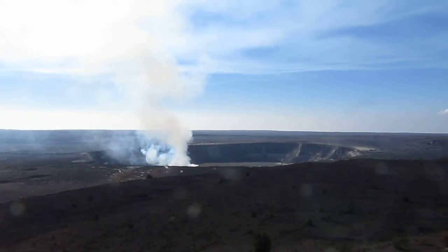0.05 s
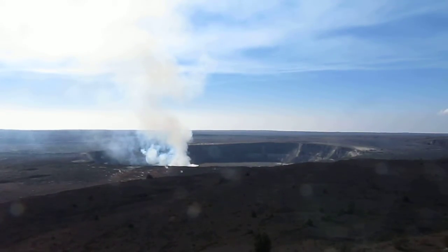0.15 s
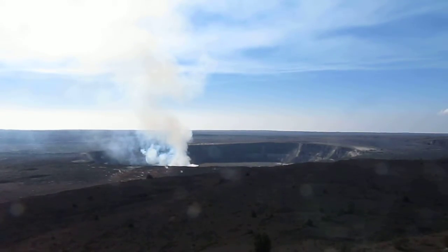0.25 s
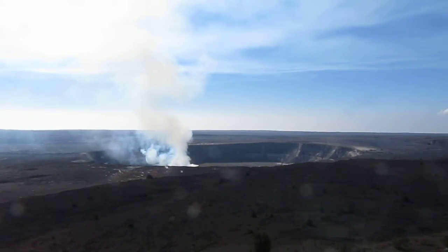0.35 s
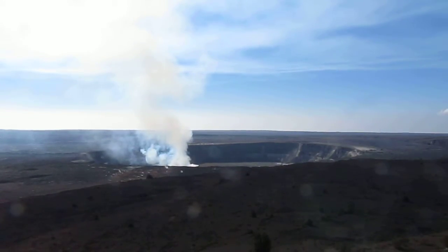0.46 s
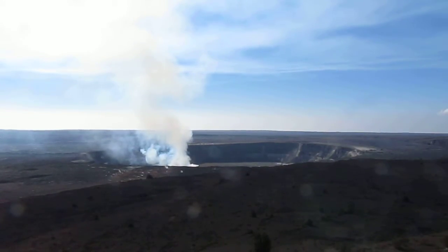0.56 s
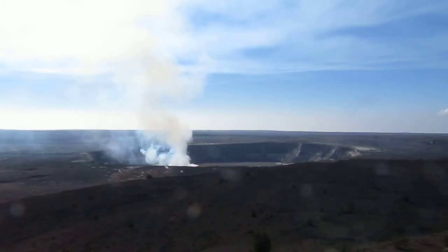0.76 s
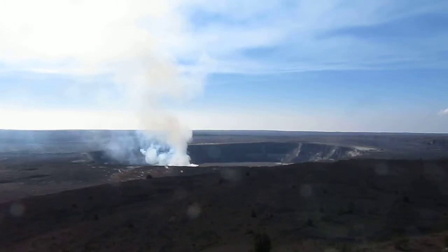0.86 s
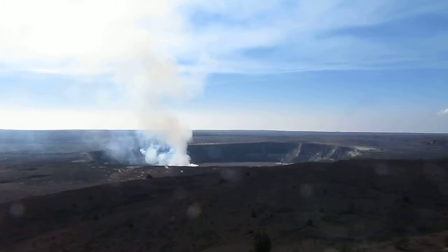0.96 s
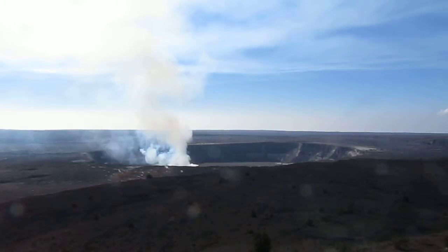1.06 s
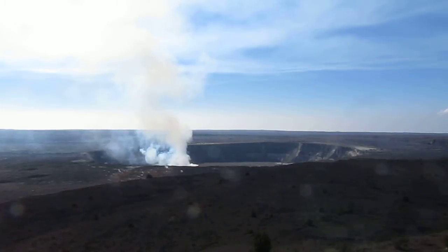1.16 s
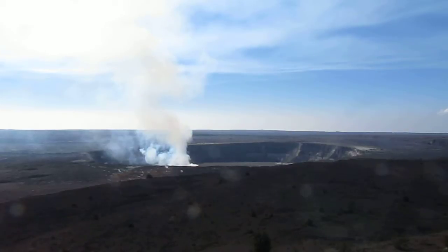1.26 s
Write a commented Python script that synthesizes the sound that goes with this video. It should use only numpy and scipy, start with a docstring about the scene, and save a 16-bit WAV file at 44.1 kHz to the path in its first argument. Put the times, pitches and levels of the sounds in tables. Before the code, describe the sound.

A gust of wind hits the microphone, stronger on the left, with a low flutter and irregular short thumps that swell and die down. Behind it, steam hisses softly and evenly from a far crater across open ground.

```python
"""Steam hisses steadily from a distant vent on open volcanic ground.
A gust rises and fades at the stereo microphone: eddies strike the left port as short, dull thumps
over a fluttering rumble. The recorder's wind filter thins their bass, and its stereo circuit feeds
them inverted to the right. Its gain dips a little after the hardest thumps."""
import sys
import numpy as np
from scipy import signal
from scipy.fft import rfft, irfft
from scipy.io import wavfile
from scipy.ndimage import uniform_filter1d

SR = 44100
rng = np.random.default_rng(int(sys.argv[2]) if len(sys.argv) > 2 else 0)


def generate_wav(sig):
    """Save sig (samples, or channels by samples) to the path in sys.argv[1] as 16-bit PCM at SR."""
    pcm = np.round(np.clip(np.atleast_2d(sig).T, -1, 1) * 32767).astype(np.int16)
    wavfile.write(sys.argv[1], SR, pcm)


N = 57330


def undb(db):
    """Decibels to gain."""
    return 10 ** (np.asarray(db) / 20)


def unit(x):
    """Scale to rms 1."""
    return x / np.sqrt(np.mean(x ** 2))


def over_hz(points):
    """A table over log frequency, read at every bin."""
    hz, value = np.array(points, float).T
    return np.interp(np.log(np.fft.rfftfreq(N, 1 / SR) + 1), np.log(hz), value)


def noise(gain):
    """Noise with the given gain per bin."""
    return irfft(rfft(rng.standard_normal(N)) * gain, N)


def wander(rate_hz):
    """Smooth random wander with rms 1."""
    hold = max(int(SR / rate_hz), 2)
    steps = np.repeat(rng.standard_normal(N // hold + 2), hold)
    return unit(uniform_filter1d(uniform_filter1d(steps, hold), hold)[:N])


# Colour of the steam jet, heard from far across open ground: freq_hz, relative_db
STEAM_SPECTRUM = [(40, -5.5), (150, -17), (400, -5.5), (700, 1), (1000, 2), (1700, 1), (2400, -2),
                  (3100, -5), (3900, -14), (4600, -10), (6500, -10), (8000, -15.5), (10000, -21.5),
                  (13000, -33), (15000, -41)]
# How alike the steam is in left and right: freq_hz, correlation
STEAM_CORRELATION = [(100, -0.9), (500, -0.37), (1200, -0.1), (2300, -0.24), (4000, 0.03), (14000, -.05)]


def steam():
    """The distant jet: a wide, smooth hiss that wavers a little on its way through the air."""
    colour = undb(over_hz(STEAM_SPECTRUM))
    alike = np.clip(over_hz(STEAM_CORRELATION), -1, 1)
    mid = noise(colour * np.sqrt(1 + alike))
    side = noise(colour * np.sqrt(1 - alike))
    level_db = -57.5 + 0.32 * wander(rate_hz=5.4)
    return unit(np.array([mid + side, mid - side])) * undb(level_db)


def wind_filter(freq_hz, cut_hz=268.7, q=1.66):
    """Response of the recorder's slightly ringing bass cut."""
    s = 1j * freq_hz / cut_hz
    return s ** 2 / (s ** 2 + s / q + 1)


# Strength of the gust at the microphone, as the level of its rumble: time_s, level_db
GUST_LEVELS = [(0, -57), (.18, -60), (0.212, -44), (.29, -47), (.37, -43), (0.416, -50.5), (0.438, -31),
               (0.518, -41), (.6, -37.5), (.7, -39), (.74, -48), (.79, -44.5), (.835, -33), (0.922, -39),
               (.97, -37.5), (1.059, -47), (1.15, -43), (1.23, -47), (1.3, -47.5)]
# Colour of the rumble at the port, ahead of the wind filter: freq_hz, relative_db
RUMBLE_SPECTRUM = [(30, 3), (100, 8.5), (190, 4), (300, -9), (500, -12), (800, -16), (1300, -29),
                   (2500, -81)]


def rumble(flutter_db=2):
    """Small turbulence flutters right at one port and swells with the gust."""
    gust_db = np.interp(np.arange(N) / SR, *np.array(GUST_LEVELS).T)
    flow = noise(undb(over_hz(RUMBLE_SPECTRUM)) * wind_filter(np.fft.rfftfreq(N, 1 / SR)))
    flutter = undb(flutter_db * wander(rate_hz=60))
    return undb(gust_db) * unit(flow * flutter)


# Eddies striking the left port of the microphone: time_s, relative_peak_db, upper_edge_hz
EDDY_STRIKES = [(0.0411, -38.5, 400), (0.0971, -40, 370), (.2185, -25, 810), (0.2511, -22, 810),
                (0.2692, -23.5, 764), (0.3089, -39, 600), (0.317, -25.5, 950), (0.3356, -29, 634),
                (0.3667, -32.5, 543), (0.376, -32.5, 493), (0.406, -28, 860), (0.4351, -16, 620),
                (.4481, -21.5, 755), (.4566, -11, 830), (0.4791, -21.5, 820), (0.496, -26, 420),
                (0.504, -29.5, 423), (0.5282, -32.5, 424), (0.5497, -21.5, 950), (0.553, -26.5, 630),
                (0.5597, -19.5, 650), (0.5688, -21.5, 715), (0.5851, -12.5, 1540), (0.598, -21.5, 626),
                (.6130, -16, 1100), (0.6203, -17.5, 1160), (0.6285, -12, 1375), (0.6413, -30, 700),
                (0.6581, -17.5, 1130), (.6680, -29, 1050), (0.684, -9.5, 1530), (.6935, -11, 1670),
                (0.7017, -13.5, 1760), (0.7125, -38, 818), (0.7608, -30.5, 800), (0.7652, -33, 696),
                (.7972, -59, 600), (.8143, -19, 836), (0.8265, -26, 785), (0.8333, -7.5, 1100),
                (0.845, -19.5, 580), (.8479, -17.5, 580), (0.856, -18, 1360), (0.8636, -16.5, 950),
                (0.8738, -29, 550), (0.8825, -32, 537), (0.9526, -31, 473), (0.9797, -32.5, 394),
                (1.0047, -32, 505), (1.103, -32, 400), (1.1479, -36.5, 550), (1.1642, -36.5, 526),
                (1.263, -32.5, 476), (1.2700, -35, 505)]


def eddies(size=4096):
    """Each eddy is a rounded pressure dip in a turbulent wake; a hard one rings the port and snaps."""
    wake_db, rise_s, decay_s = -4, 0.0032, 0.0044
    hollow_hz, hollow_octaves = 950, 0.21  # the port's resonance: centre, width
    snap_db, snap_hz = -37, 2920
    tilt_db_per_octave, rolloff_db_per_octave, trim_db = -5, 44, -0.5
    t = (np.arange(size) - size // 2) / SR
    f = np.fft.rfftfreq(size, 1 / SR) + 1
    wake_envelope = np.exp(-np.maximum(t, 0) / decay_s + np.minimum(t, 0) / rise_s)
    hollow = np.exp(-(np.log2(f / hollow_hz) / hollow_octaves) ** 2)
    snap = undb(snap_db) * np.exp(-(f / snap_hz) ** 2 / 2)
    tilt_db = tilt_db_per_octave * np.log2(np.hypot(1, f / 268.7))  # above the wind filter's corner
    hardest_db = max(row[1] for row in EDDY_STRIKES)
    out = np.zeros(N + 2 * size)
    for time_s, peak_db, upper_edge_hz in EDDY_STRIKES:
        hardness = undb(6.2 * (peak_db - hardest_db))  # near 0 for all but the hardest blows
        wake = rng.standard_normal(size) * wake_envelope
        pressure = undb(wake_db) * wake / np.linalg.norm(wake) - (t == 0)
        treble_loss = np.hypot(1, undb(rolloff_db_per_octave * np.log2(f / upper_edge_hz)))
        lower_edge_hz = 0.13 * upper_edge_hz  # small, fast eddies carry less bass
        bass_loss = np.hypot(1, (lower_edge_hz / f) ** 2)
        ring_db = (0.5 + 6.5 * hardness) * hollow
        body = undb(tilt_db + ring_db) / (treble_loss * bass_loss)
        thump = irfft(rfft(pressure) * (body + hardness * snap) * wind_filter(f), size)
        thump /= np.abs(signal.hilbert(thump)).max()
        start = int(time_s * SR) + size // 2
        out[start:start + size] += undb(peak_db + trim_db) * thump
    return out[size:size + N]


def stereo_circuit(wind, cross_gain=0.65, cross_hz=1100):
    """Wind on one port feeds its own channel, and a duller inverted copy feeds the other."""
    dulled = irfft(rfft(wind) / (1 + 1j * np.fft.rfftfreq(N, 1 / SR) / cross_hz), N)
    return np.array([wind, -cross_gain * dulled])


def scene():
    """Steam in the distance, wind right on the microphone and mostly on its left port."""
    far_steam = steam()
    left_wind = stereo_circuit(eddies() + rumble())
    right_wind = undb(-9) * stereo_circuit(rumble())[::-1]
    return far_steam + left_wind + right_wind


def record(dry):
    """The recorder turns down a little after the hardest thumps, recovers slowly, and cuts the top."""
    threshold_db, share_removed, attack_s, top_hz = -13.5, 0.46, 0.0029, 15000
    peak_db = 20 * np.log10(np.abs(dry).max(axis=0) + np.finfo(float).eps)
    excess_db = np.maximum(peak_db - threshold_db, 0)
    recovery_db = 3 * np.arange(N) / SR  # the held excess falls 3 dB a second
    held_db = np.maximum.accumulate(excess_db + recovery_db) - recovery_db
    pole = np.exp(-1 / (attack_s * SR))
    gain = undb(-share_removed * signal.lfilter([1 - pole], [1, -pole], held_db))
    top_cut = signal.ellip(8, .2, 70, top_hz, fs=SR, output="sos")
    return signal.sosfilt(top_cut, dry * gain)


dry = scene()
out = record(dry)
generate_wav(out)
```